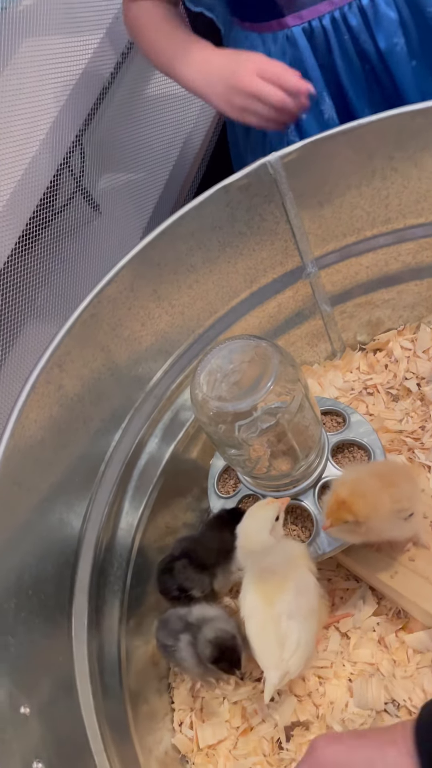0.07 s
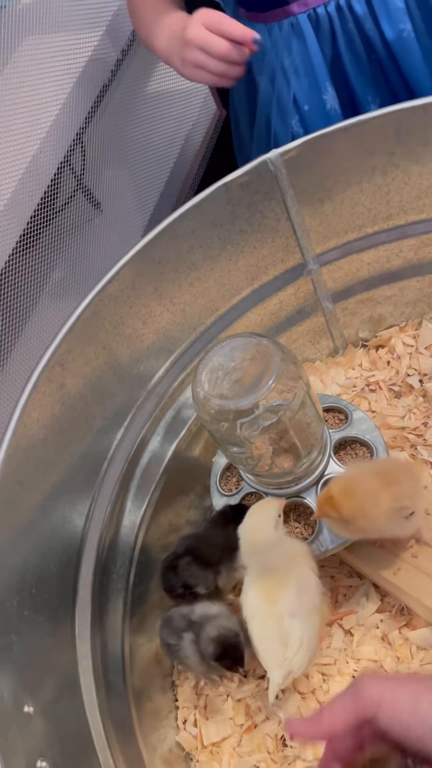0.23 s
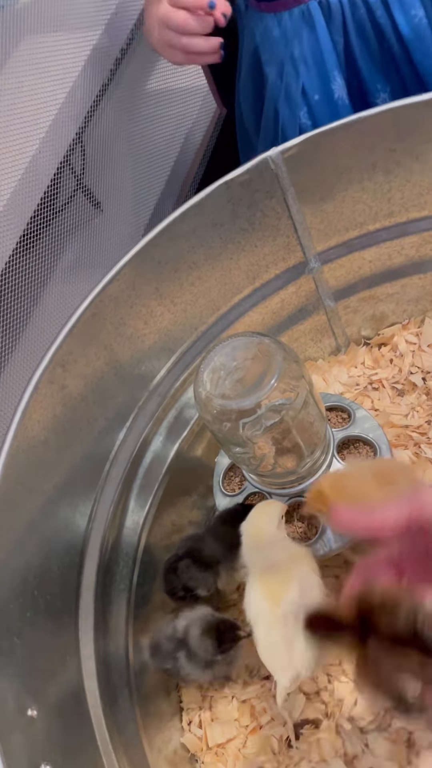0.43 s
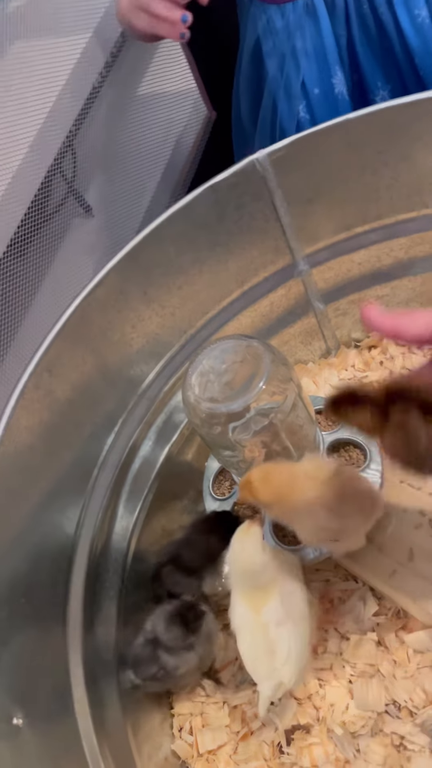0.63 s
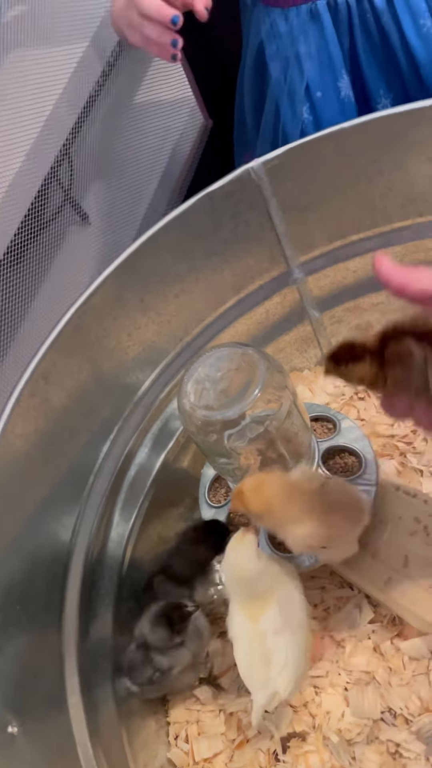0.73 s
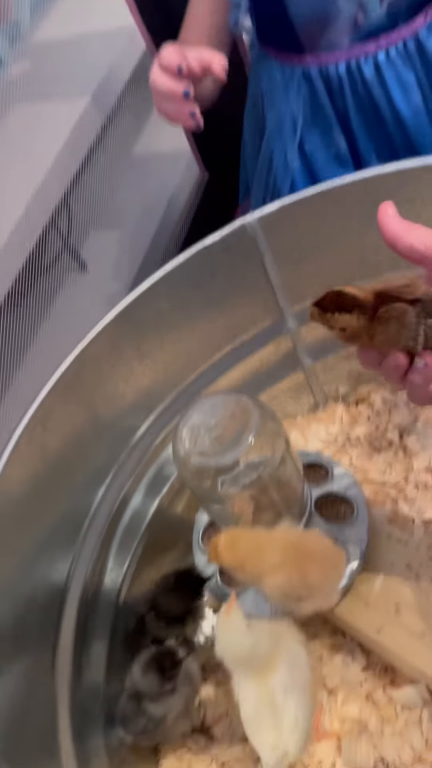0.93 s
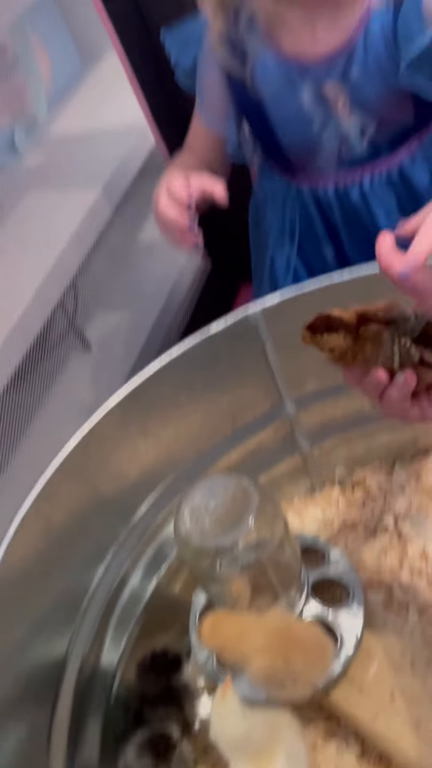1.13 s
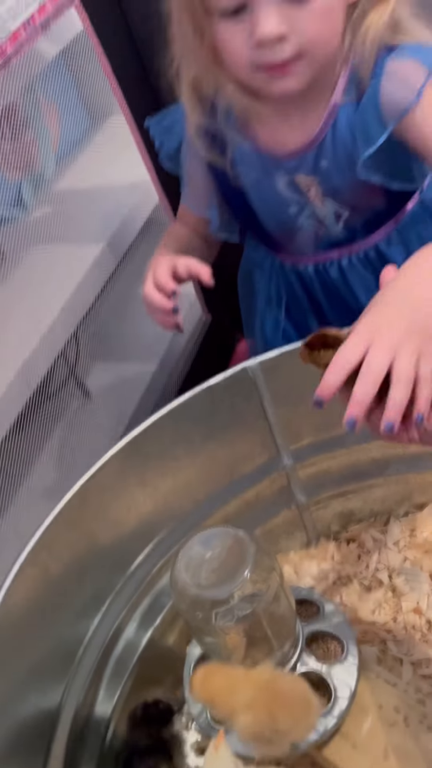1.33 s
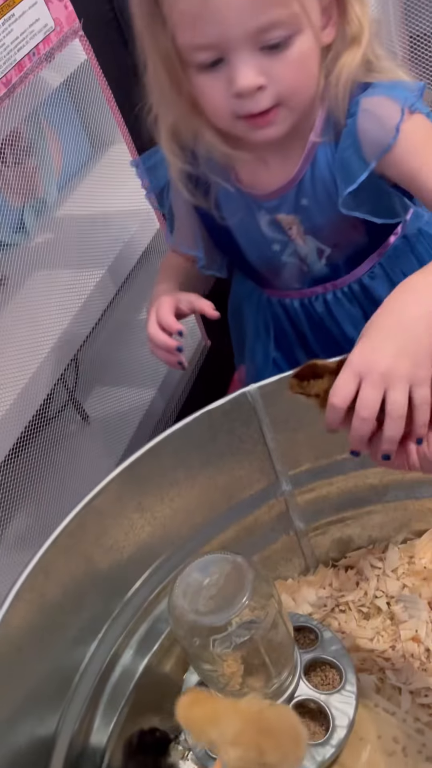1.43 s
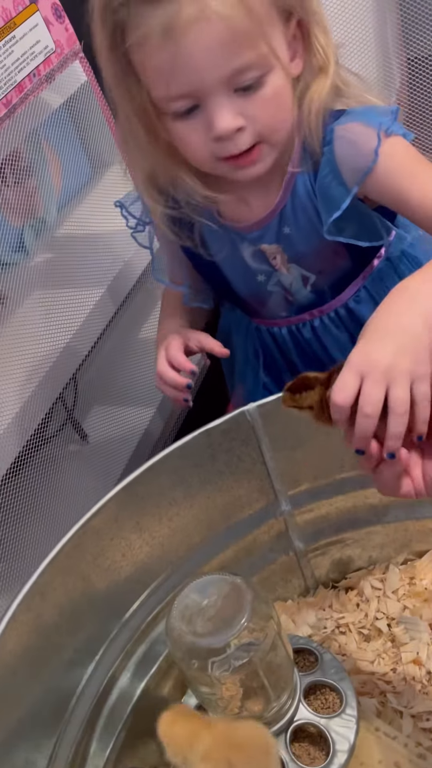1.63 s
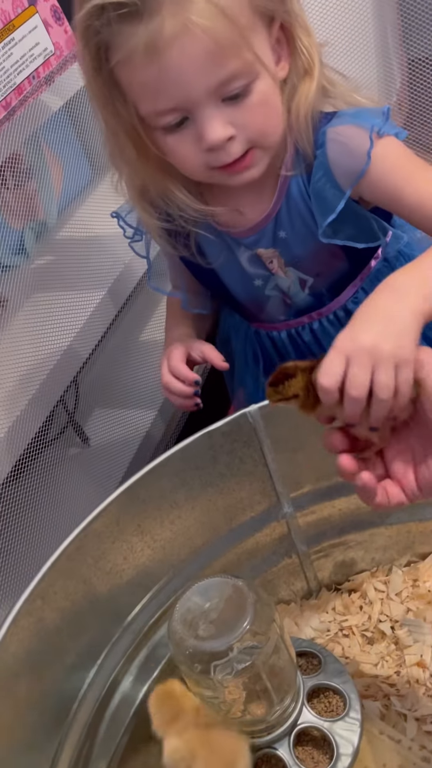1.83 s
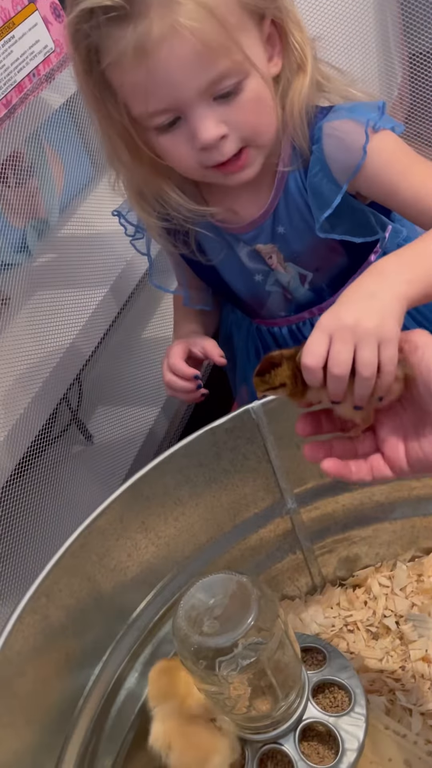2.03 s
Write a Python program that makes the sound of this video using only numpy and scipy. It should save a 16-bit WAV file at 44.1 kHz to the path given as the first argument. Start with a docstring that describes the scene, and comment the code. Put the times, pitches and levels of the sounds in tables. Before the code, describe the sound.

Loud high chick peeps ring in a steel brooder, with softer cheeps, a short trill and light ticks

```python
"""A chick in a steel brooder tub indoors peeps loudly five times: fluttering rise, clear falling whistle, quick drop.
Other chicks answer with soft cheeps and a short trill; every voice is a frequency-modulated tone with weak harmonics.
Beaks and feet tick as decaying noise, shavings rustle as shaped noise, and soft knocks ring the tub's modes.
Dense reflections from the tub walls and a small room follow the calls and ticks.
Rumble, room air and a low wavering hum lie beneath, all heard through two microphone ports."""
import sys
import numpy as np
from scipy import signal
from scipy.fft import rfft, irfft
from scipy.io import wavfile
from scipy.ndimage import uniform_filter1d

SR = 44100
rng = np.random.default_rng(int(sys.argv[2]) if len(sys.argv) > 2 else 0)


def wav_out(sig):
    """Save sig, one row per channel (or a flat mono array), as 16-bit PCM at SR to the path in sys.argv[1]."""
    wavfile.write(sys.argv[1], SR, np.round(np.clip(np.atleast_2d(sig).T, -1, 1) * 32767).astype(np.int16))


N = 92389  # length [samples]


def undb(db):
    """Decibel law: level to amplitude ratio."""
    return 10 ** (np.asarray(db) / 20)


def unit(x):
    """Normalisation to an rms of 1."""
    return x / np.sqrt(np.mean(x ** 2))


def times():
    """Uniform sampling: the time of each sample [s]."""
    return np.arange(N) / SR


def turning(hz):
    """Phase is the running integral of frequency [radians]."""
    return 2 * np.pi * np.cumsum(hz) / SR


def over_time(points):
    """Linear interpolation of a (time [s], level [dB]) table."""
    s, db = np.array(points).T
    return np.interp(times(), s, db)


def over_hz(points, column=1):
    """Interpolation of one table column along a log-frequency axis."""
    p = np.array(points, float)
    bins_hz = np.arange(N // 2 + 1) * SR / N
    return np.interp(np.log(bins_hz + 1), np.log(p[:, 0]), p[:, column])


def noise(colour):
    """Spectral shaping: white noise filtered to (frequency [Hz], level [dB]) points."""
    white = rng.standard_normal(N)
    return unit(irfft(rfft(white) * undb(over_hz(colour)), N))


def band(edges_hz):
    """Band-pass filtering: noise between two frequencies."""
    sos = signal.butter(2, edges_hz, "band", fs=SR, output="sos")
    return unit(signal.sosfilt(sos, rng.standard_normal(N)))


def walk(rate_hz):
    """Random modulation: noise smoothed twice over 1 / rate, with an rms of 1."""
    k = max(int(SR / rate_hz), 1)
    smooth = uniform_filter1d(rng.standard_normal(N), k)
    return unit(uniform_filter1d(smooth, k))


# Differences between the two microphone ports:
# (frequency [Hz], phase lead of left [radians], level of left minus right [dB])
PORT_DIFFERENCES = [(150, 0, 0), (500, .8, -1), (2400, .75, 0), (3350, .3, 0), (3650, .7, -5),
                    (3920, 1.4, -6.5), (4150, 2, -2), (4550, 2.3, -2.5), (4950, 2.75, -1), (5500, 1.6, 0),
                    (8000, 1.8, 0), (8600, 3, 0), (9400, 3.1, 0), (10200, .4, 0), (11500, .1, 0)]


def ports(x):
    """Interchannel phase and level differences that depend on frequency, split evenly between two ports."""
    lead = over_hz(PORT_DIFFERENCES, column=1)
    balance_db = over_hz(PORT_DIFFERENCES, column=2)
    left = undb(balance_db / 2) * np.exp(.5j * lead)
    return irfft(rfft(x) * np.array([left, 1 / left]), N)


# Spectrum of the air noise common to the ports: (frequency [Hz], level [dB])
AIR_COLOUR = [(30, -7.5), (65, 6.5), (130, -3), (260, -41), (650, -14), (1000, -23), (2500, -22),
              (7000, -20), (11000, -22)]
# Spectrum of the air noise opposed at the ports: (frequency [Hz], level [dB])
DRAUGHT_COLOUR = [(40, -6), (160, -3), (450, -4), (1200, -19.5), (3000, -21), (8000, -21.5), (10000, 5),
                  (11500, -5.5)]
AIR_DB, DRAUGHT_DB = -56.5, -65


def air():
    """Broadband noise: room air shared by the ports plus a draught of opposite sign at each."""
    room = undb(AIR_DB) * ports(noise(AIR_COLOUR))
    draught = undb(DRAUGHT_DB) * noise(DRAUGHT_COLOUR)
    return room + draught * np.array([[1], [-1]])


HUM_HZ, HUM_WANDER_HZ, HUM_DB = 44.7, 1.5, -54.5  # wander is rms


def hum():
    """Slow frequency and amplitude modulation of a single low tone."""
    tone = np.sqrt(2) * np.sin(turning(HUM_HZ + HUM_WANDER_HZ * walk(9)))
    return undb(HUM_DB) * (1 + 0.067 * walk(42)) * tone


# Handling rumble: (time [s], level [dB])
RUMBLE_LEVEL = [(0, -57), (.33, -56.5), (.5, -66), (.74, -58), (.9, -66), (1.02, -72), (1.45, -67),
                (1.85, -64), (2, -73.5)]
RUMBLE_BAND_HZ = (100, 320)


def rumble():
    """Amplitude-modulated low-band noise of handling."""
    return band(RUMBLE_BAND_HZ) * undb(over_time(RUMBLE_LEVEL) + 1.84 * walk(25))


# Stirring of shavings and clothes: (time [s], level [dB])
RUSTLE_LEVEL = [(0, -52.5), (.45, -77), (.62, -52), (0.781, -48), (.92, -54), (1.02, -63), (1.6, -73.5),
                (1.85, -50.5), (2.09, -84)]
# Spectrum of the rustle: (frequency [Hz], level [dB])
RUSTLE_SPECTRUM = [(250, -20), (520, -2), (1000, -16), (2500, -15.5), (6000, -9), (11000, -14.5)]


def rustle():
    """Friction noise of shavings and clothes, with slow and fast level modulation."""
    level_db = over_time(RUSTLE_LEVEL) + 0.52 * walk(40) + 1.8 * walk(270)
    return noise(RUSTLE_SPECTRUM) * undb(level_db)


# Soft knocks on the tub: (time [s], level of the push [dB], contact length [s])
KNOCK_PUSHES = [(.527, -53, 0.00028), (.574, -41, 0.00027), (1.478, -43.5, 0.0021)]
# Modes of the tub: (frequency [Hz], level per unit push [dB], time to decay by 60 dB [s])
TUB_MODES = [(333, 2, 0.097), (549, 2.5, 0.032), (934, -17, 0.092)]


def knocks():
    """Modal excitation: each bell-shaped push is convolved with the tub's decaying low modes."""
    t, push = times(), 0
    ring = sum(undb(db - 60 * t / t60) * np.sin(2 * np.pi * hz * t) for hz, db, t60 in TUB_MODES)
    for s, db, contact in KNOCK_PUSHES:
        blow = np.exp(-(2 * (t - s) / contact) ** 2)
        push = push + undb(db) * blow / blow.sum()
    return signal.fftconvolve(push, ring)[:N]


# Pecking and scratching: (time [s], onset level of the body [dB], onset level of the treble [dB])
TICK_STRIKES = [(0.129, -51.5, -58), (1.222, -57, -41), (1.394, -64.5, -77), (1.622, -80, -50),
                (1.739, -45, -44.5), (1.885, -52, -40.5), (2.004, -56.5, -49.5)]
TICK_DECAY_S, TICK_GRAIN_DB = 0.012, 1.5  # decay to 1/e; grain is rms
TICK_BODY_HZ, TICK_TREBLE_HZ = (1680, 4100), (5160, 11200)


def ticks():
    """Impact noise of beaks and feet: two bands start at once and decay exponentially."""
    t, out = times(), 0
    body, treble = band(TICK_BODY_HZ), band(TICK_TREBLE_HZ)
    for s, body_db, treble_db in TICK_STRIKES:
        decay = (t >= s) * np.exp(-abs(t - s) / TICK_DECAY_S)
        out = out + decay * (undb(body_db) * body + undb(treble_db) * treble)
    return out * undb(TICK_GRAIN_DB * walk(700))


TUB_ECHO_DB, TUB_T60_S = -8.5, 0.075
ROOM_ECHO_DB, ROOM_T60_S = -23, 0.23
SPREAD = 0.51  # share of the reflections that is opposed at the ports


def tail(x, t60, db, delay_s):
    """Diffuse reverberation: convolution with decaying noise of even colour, partly opposed at the ports."""
    t = times()
    fade = undb(-60 * t / t60) * (t > delay_s)
    spectrum = rfft(rng.standard_normal((2, N)) * fade)
    response = irfft(spectrum / abs(spectrum), N) * (t > delay_s) * (t < t60)
    shared, apart = undb(db) * signal.fftconvolve(x[None], response, axes=1)[:, :N]
    return ports(shared) + SPREAD * apart * np.array([[1], [-1]])


# Each caller scales the flutter depth (peak) and share by its own factor.
FLUTTER_HZ, FULL_FLUTTER_DEPTH_HZ, FULL_FLUTTER_SHARE = 197, 153, 0.4
FLUTTER_FROM_HZ, FLUTTER_FULL_HZ = 4100, 4170  # pitches between which the flutter sets in
JITTER = 0.00442  # rms share of the pitch
REEDY_BELOW_HZ, REEDY_RANGE_HZ = 3075, 300  # the second harmonic grows over this range below
HIGH_OVERTONES_DB = -17  # change of the overtones on the highest notes


def syrinx(hz, overtones_db, reedy_db, flutter_factor):
    """Joint frequency and amplitude modulation of a near-pure whistle, fluttering high and reedy low."""
    high = np.clip((hz - FLUTTER_FROM_HZ) / (FLUTTER_FULL_HZ - FLUTTER_FROM_HZ), 0, 1)
    flutter = flutter_factor * high * np.sin(turning(FLUTTER_HZ * (1 + 0.081 * walk(72))))
    phase = turning(hz * (1 + JITTER * walk(470)) + FULL_FLUTTER_DEPTH_HZ * flutter)
    reedy = np.clip((REEDY_BELOW_HZ - hz) / REEDY_RANGE_HZ, 0, 1)
    second = undb(overtones_db[0]) + undb(reedy_db) * reedy
    overtones = second * np.sin(2 * phase) + undb(overtones_db[1]) * np.sin(3 * phase)
    voice = np.sin(phase) + undb(HIGH_OVERTONES_DB * high) * overtones
    return np.sqrt(2) * (1 + FULL_FLUTTER_SHARE * flutter) * voice


# Soft cheeps and notes of the trill: (start [s], length [s], pitch at start [Hz], pitch at middle [Hz],
# pitch at end [Hz], level before the lift and sag [dB])
CHEEP_CALLS = [(0.19, 0.046, 4700, 3715, 3040, -47), (0.305, 0.033, 5270, 5470, 5360, -55.5),
               (.328, 0.06, 5095, 4775, 3810, -42.5), (.372, 0.0181, 4200, 3390, 3030, -30.5),
               (0.649, 0.11, 5210, 4234, 4050, -53), (0.849, 0.061, 4870, 4210, 3750, -48),
               (0.867, 0.074, 3914, 3330, 4130, -48.5), (0.921, 0.028, 3850, 4160, 4200, -43.5),
               (1.035, 0.047, 5300, 5380, 5100, -51.5), (1.038, 0.079, 4180, 3483, 4150, -48),
               (1.422, 0.024, 4630, 4760, 5950, -38), (1.535, 0.024, 3850, 3655, 3580, -42),
               (1.564, 0.035, 3190, 3410, 3730, -53), (1.661, 0.056, 4450, 3650, 3130, -44),
               (1.81, 0.05, 4086, 3650, 3280, -47.5), (1.941, .058, 5290, 5130, 5460, -50.5)]
CHEEP_ATTACK_S, CHEEP_RELEASE_S = 0.002, 0.036
CHEEP_LIFT_DB, CHEEP_SAG_DB = 3, 1.5
CHEEP_OVERTONES_DB = (-23, -40)  # second and third harmonic
CHEEP_FLUTTER = 0.16  # factor on the full flutter


def cheeps():
    """Parabolic pitch glide: each soft call is one arc that fades as it goes."""
    t, out = times(), 0
    for start, length, first, middle, last, db in CHEEP_CALLS:
        u = np.clip((t - start) / length, 0, 1)
        hz = np.polyval(np.polyfit([0, .5, 1], [first, middle, last], 2), u)
        gate = np.clip(np.minimum(u / CHEEP_ATTACK_S, (1 - u) / CHEEP_RELEASE_S) * length, 0, 1)
        level = undb(db + CHEEP_LIFT_DB - CHEEP_SAG_DB * u)
        out = out + gate * level * syrinx(hz, CHEEP_OVERTONES_DB, -25, CHEEP_FLUTTER)
    return out


# V-shaped swoops of the trill: (time of the lowest pitch [s], level there [dB])
TRILL_SWOOPS = [(1.4588, -37), (1.491, -37.5), (1.5265, -40.5)]
TRILL_LOW_HZ, TRILL_HIGH_HZ = 3050, 5800
TRILL_SWOOP_S, TRILL_FADE_DB = .034, 20
EDGE_S = 0.00354  # fade at both ends of swoops and peeps


def trill():
    """Coupled pitch and level: each swoop goes down and up again, loudest at the bottom."""
    t, out = times(), 0
    for s, db in TRILL_SWOOPS:
        u = np.clip((t - s) / TRILL_SWOOP_S, -.5, .5)
        height = np.sin(np.pi * u) ** 2
        gate = np.clip((.5 - abs(u)) * TRILL_SWOOP_S / EDGE_S, 0, 1)
        phase = turning(TRILL_LOW_HZ + (TRILL_HIGH_HZ - TRILL_LOW_HZ) * height)
        tone = np.sin(phase) + undb(CHEEP_OVERTONES_DB[0]) * np.sin(2 * phase)
        out = out + gate * undb(db - TRILL_FADE_DB * height ** 2) * np.sqrt(2) * tone
    return out


# Loud peeps, one list of points each: (time [s], pitch [Hz], level [dB])
PEEP_CONTOURS = [
    [(0, 3375, -48.5), (.02, 4476, -45.5), (.048, 4650, -42), (.068, 4117, -32.5), (.118, 4010, -26.5),
     (.143, 3790, -32), (.151, 3384, -31), (.155, 2870, -32.5), (.172, 2360, -35), (.184, 2170, -49)],
    [(.378, 3617, -42), (.412, 4862, -31.5), (.445, 4380, -30), (.456, 4330, -38), (.468, 4050, -24),
     (.498, 3815, -20.5), (.526, 3350, -25), (.535, 2570, -29.5), (.55, 1990, -47.5)],
    [(.682, 3900, -46.5), (.702, 4795, -39.5), (.73, 4890, -37), (.756, 4463, -27.5), (.772, 4000, -26.5),
     (.8, 3580, -17.5), (.812, 3280, -25), (.819, 2744, -25), (.843, 2010, -44.5)],
    [(1.05, 4290, -52.5), (1.082, 5020, -33.5), (1.108, 4560, -41), (1.138, 3960, -24),
     (1.158, 3862, -21.5), (1.18, 3483, -31), (1.191, 2686, -32.5), (1.216, 2102, -40)],
    [(1.742, 4230, -51), (1.775, 4580, -41.5), (1.8, 4236, -45), (1.82, 3837, -33.5), (1.842, 3850, -33),
     (1.876, 3524, -38), (1.888, 2820, -63), (1.899, 2530, -40.5)],
]
PEEP_OVERTONES_DB, PEEP_REEDY_DB = (-31, -43.5), -8  # second and third harmonic; reedy second
PEEP_FLUTTER = 0.87  # factor on the full flutter


def peeps():
    """Contour-driven frequency modulation: the loud chick follows pitch and level through each peep."""
    t, out = times(), 0
    for peep in PEEP_CONTOURS:
        s, hz, db = np.array(peep).T
        gate = np.clip(np.minimum(t - s[0], s[-1] - t) / EDGE_S + .5, 0, 1)
        pitch = uniform_filter1d(np.interp(t, s, hz), size=200)
        voice = syrinx(pitch, PEEP_OVERTONES_DB, PEEP_REEDY_DB, PEEP_FLUTTER)
        out = out + gate * undb(np.interp(t, s, db)) * voice
    return out


def scene():
    """Superposition of direct sound, reflections and background."""
    quaver = undb(0.5 * walk(170))  # the soft calls waver by 0.5 dB rms
    calls = peeps() + (cheeps() + trill()) * quaver + ticks()
    tub = tail(calls, TUB_T60_S, TUB_ECHO_DB, delay_s=.0015)
    room = tail(calls, ROOM_T60_S, ROOM_ECHO_DB, delay_s=.0069)
    direct = ports(calls + knocks() + rustle() + rumble())
    return direct + tub + room + hum() + air()


# Response of the microphone: (frequency [Hz], level [dB])
MIC_RESPONSE = [(8200, 0), (9000, -2.5), (9900, 0.5), (11600, 5.5), (12600, -21.5), (14000, -16.5)]
TOP_HZ = 13600


def record(dry):
    """Linear filtering: the microphone colours the treble, then a steep low-pass removes the top."""
    coloured = irfft(rfft(dry) * undb(over_hz(MIC_RESPONSE)), N)
    low_pass = signal.ellip(8, .2, 70, TOP_HZ, fs=SR, output="sos")  # ripple and stopband in dB
    return signal.sosfilt(low_pass, coloured)


dry = scene()
out = record(dry)
wav_out(out)
```